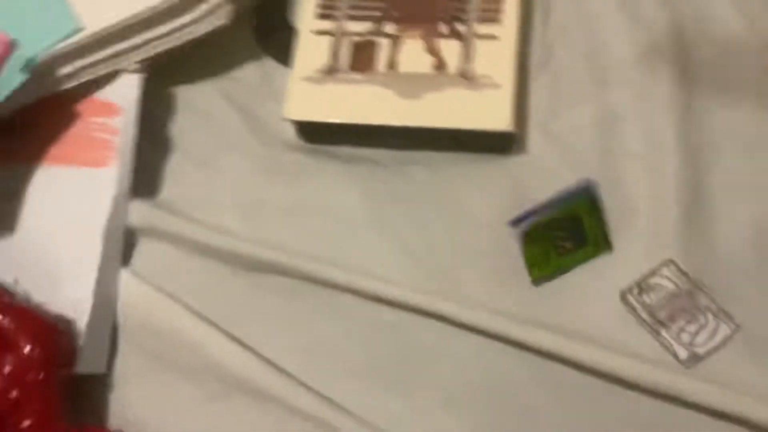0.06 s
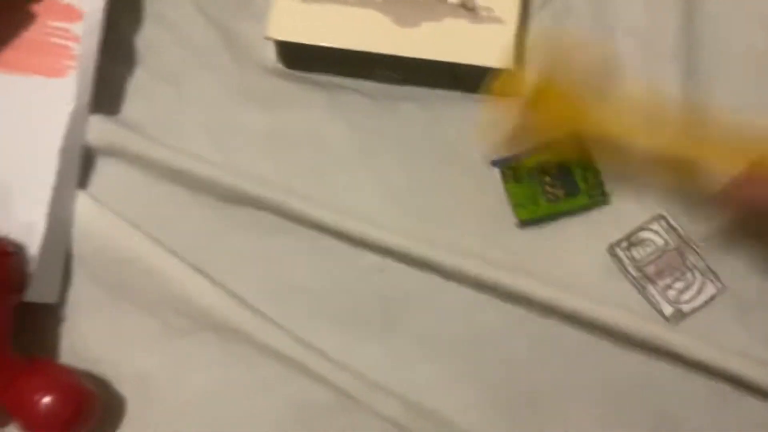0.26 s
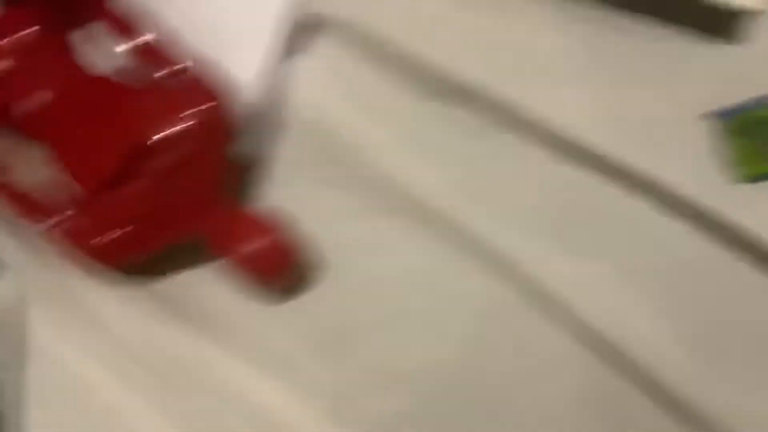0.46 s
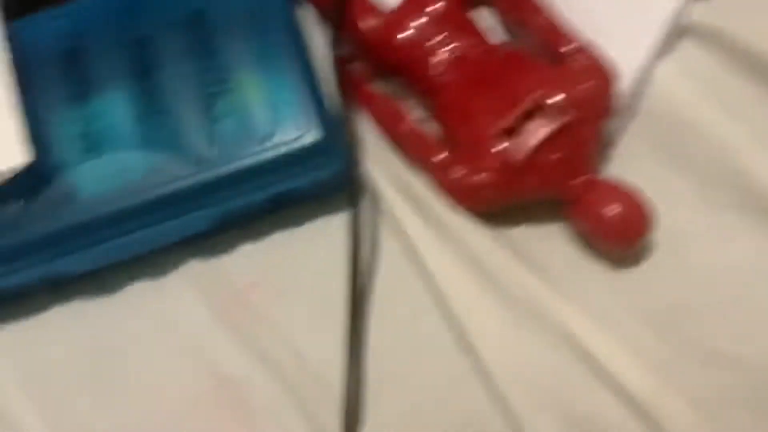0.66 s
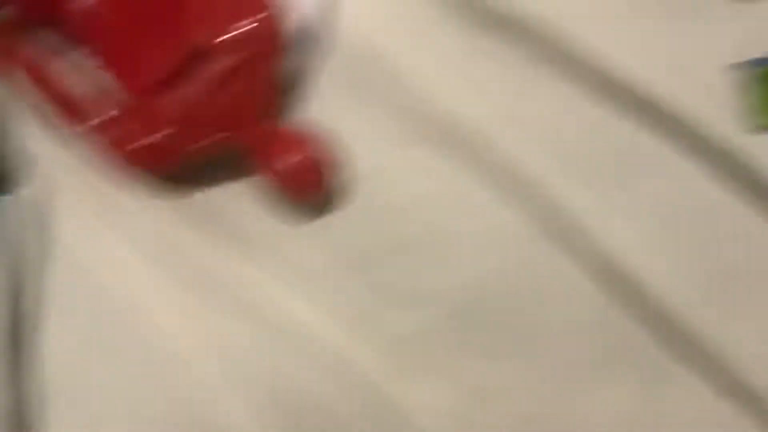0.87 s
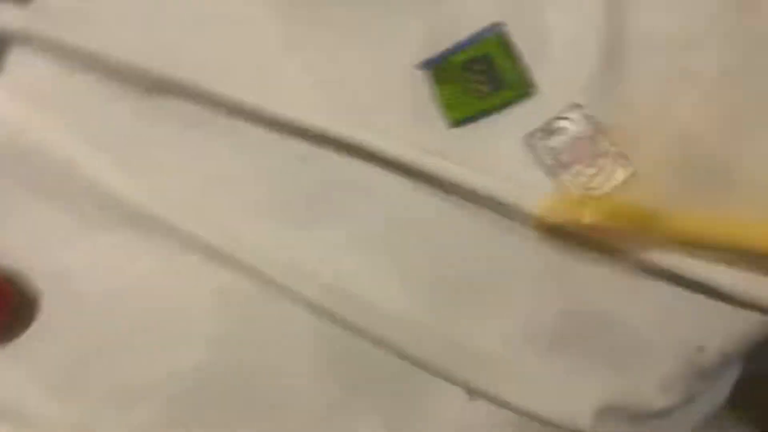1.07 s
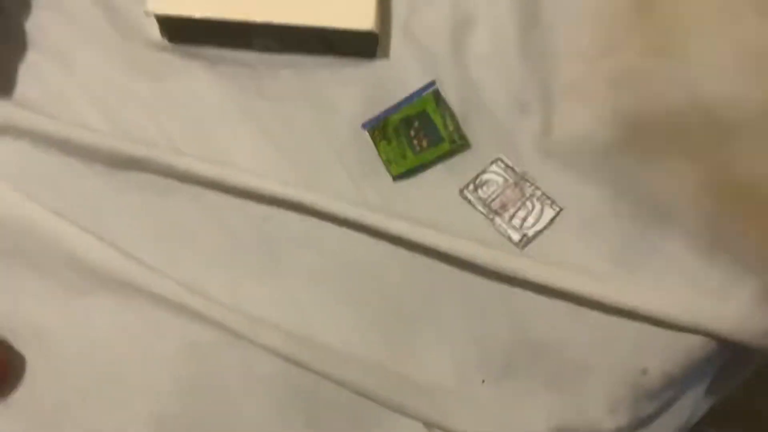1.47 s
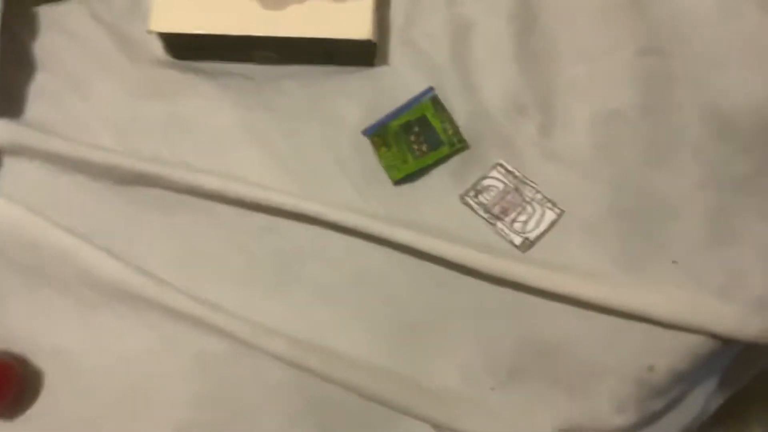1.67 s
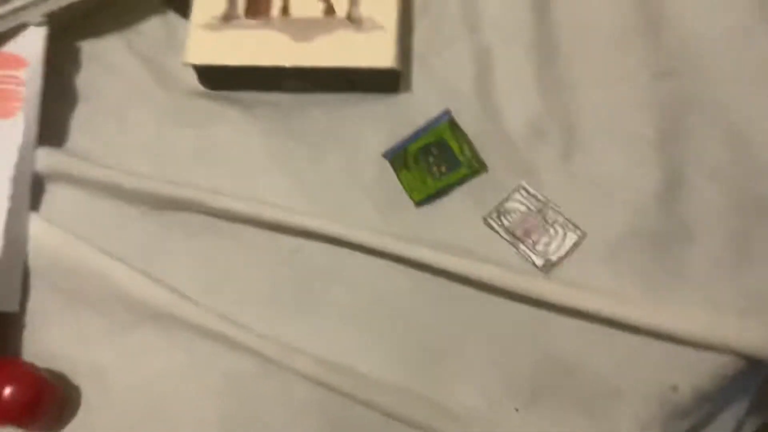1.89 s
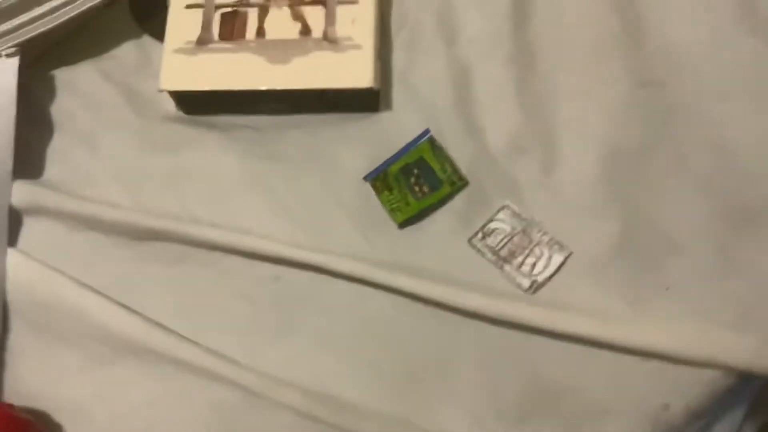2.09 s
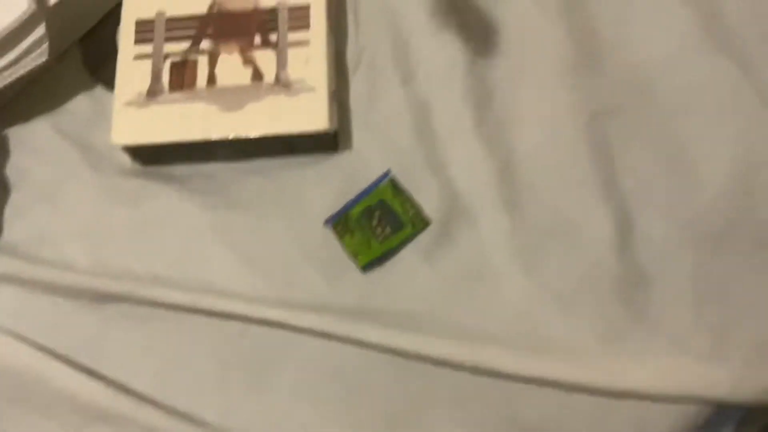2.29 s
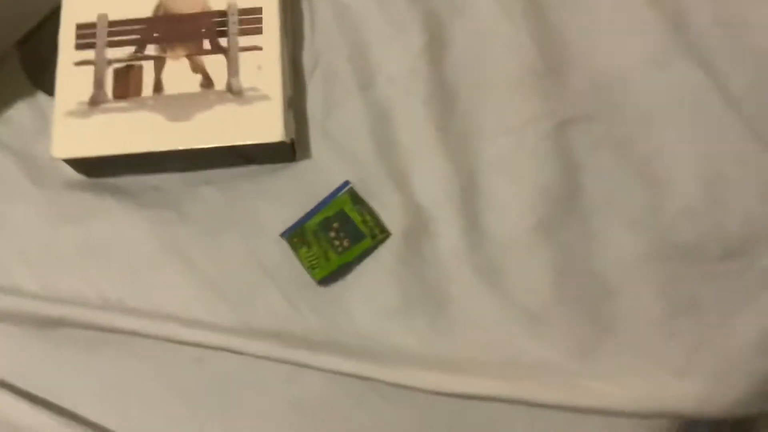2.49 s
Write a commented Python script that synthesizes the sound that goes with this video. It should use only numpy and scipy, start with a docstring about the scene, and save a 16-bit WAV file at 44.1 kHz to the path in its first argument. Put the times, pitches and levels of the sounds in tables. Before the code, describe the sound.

A plastic toy hammer knocks small pieces on bedding, each hit a crack and thump.

```python
"""Sharp, thumpy knocks: a plastic toy hammer hits small flat plastic pieces on a sheet-covered bed.
Each blow is a 2 ms crack of plastic, then a thump that falls in pitch as the springy bedding
carries highs faster than lows. Now and then a piece rattles against the hammer.
The quiet room answers briefly; between blows the cloth rustles faintly over a low rumble."""
import sys
import numpy as np
from scipy import signal
from scipy.fft import rfft, irfft, next_fast_len
from scipy.io import wavfile

SR = 44100
rng = np.random.default_rng(int(sys.argv[2]) if len(sys.argv) > 2 else 0)


def to_wav(sig):
    """Store sig (one row per channel, or 1-D mono) as 16-bit WAV at the path in sys.argv[1].

    Samples outside -1..1 are clipped; the rate is SR.
    """
    pcm = np.clip(np.atleast_2d(sig), -1, 1) * 32767
    pcm = np.round(pcm).astype(np.int16)
    wavfile.write(sys.argv[1], SR, pcm.T)  # frames by channels


N = 116865
LEAD = SR // 10  # samples of pre-roll before time zero
TIME = np.arange(N) / SR
BLOW_TIME = TIME[:SR // 8]


def from_db(db):
    """Decibels to gain."""
    return 10 ** (np.asarray(db) / 20)


def rms_one(x):
    """Scale to rms 1."""
    return x / np.sqrt(np.mean(x ** 2) + 1e-20)


def at_hz(points, hz):
    """Read a curve on a log-frequency axis."""
    freqs, values = np.transpose(points)
    return np.interp(np.log(np.maximum(hz, 1)), np.log(freqs), values)


def equalise(x, curve):
    """Minimum-phase EQ: nothing rings ahead of an attack."""
    size = 2 * next_fast_len(x.shape[-1])
    gain = from_db(at_hz(curve, np.fft.rfftfreq(size, 1 / SR)))
    cepstrum = irfft(np.log(gain))
    cepstrum[1:size // 2] *= 2
    cepstrum[size // 2 + 1:] = 0
    return irfft(rfft(x, size) * np.exp(rfft(cepstrum)))[..., :x.shape[-1]]


def stereo_noise(correlation, size):
    """White noise whose stereo width depends on frequency."""
    mid, side = rfft(rng.standard_normal((2, size)))
    shared = at_hz(correlation, np.fft.rfftfreq(size, 1 / SR))
    return irfft(np.sqrt(1 + shared) * mid + np.sqrt(1 - shared) * side * [[1], [-1]], size)


def pan(x, balance, phase=None):
    """Set the level and phase difference between left and right at each frequency."""
    size = next_fast_len(x.shape[-1] + LEAD)
    hz = np.fft.rfftfreq(size, 1 / SR)
    left_lead = at_hz(phase, hz) if phase else 0
    left = from_db(at_hz(balance, hz) / 2) * np.exp(.5j * left_lead)
    return irfft(rfft(x, size) * np.array([left, 1 / left]), size)[:, :x.shape[-1]]


def add(track, start_s, sound):
    """Mix a sound into a track that has pre-roll."""
    start = max(LEAD + int(start_s * SR), 0)
    part = sound[:len(track) - start]
    track[start:start + len(part)] += part


# Room tone, heavy in the bass: freq_hz, gain_db
RUMBLE_EQ = [(25, -20.5), (50, -7.5), (75, 1), (105, 4.5), (150, -11), (220, -15), (350, -22.5), (600, -32),
             (1600, -41.5), (2800, -46), (6000, -53.5), (16000, -51)]
# Stereo width as heard, centred lows and top, wide mids: freq_hz, correlation
RUMBLE_CORRELATION = [(120, .96), (250, .85), (550, .3), (2000, .2), (6000, .4), (10000, .9)]
def rumble(level_db=-46.5):
    """The room's steady low rumble with a trace of hiss."""
    noise = stereo_noise(RUMBLE_CORRELATION, LEAD + N)
    return from_db(level_db) * rms_one(equalise(noise, RUMBLE_EQ)[:, LEAD:])


# Tone of the sheet's rustle: freq_hz, gain_db
CLOTH_EQ = [(300, 2), (800, 2), (1600, 2), (2400, -5.5), (4000, -0.5), (7000, -5.5), (11000, -8),
            (16000, 0)]
# Stereo width as heard: freq_hz, correlation
CLOTH_CORRELATION = [(1000, 0.13), (8000, 0.53)]
# Light brushes of the sheet: peak_s, half_width_s, level_db
CLOTH_BRUSHES = [(0.538, .015, -71), (.6, 0.009, -83), (.745, 0.03, -57), (0.872, 0.021, -63),
                 (0.969, 0.024, -55.5), (1.06, 0.045, -53), (2.634, 0.013, -66)]
def cloth():
    """Fibres rub in soft, grainy swells."""
    swells = sum(from_db(level_db) * np.exp(-((TIME - peak_s) / half_width_s) ** 2)
                 for peak_s, half_width_s, level_db in CLOTH_BRUSHES)
    noise = stereo_noise(CLOTH_CORRELATION, N)
    grain = from_db(3 * rng.standard_normal(N // 64 + 1)).repeat(64)[:N]
    return swells * rms_one(equalise(noise * grain, CLOTH_EQ))


# Tone of the reverb: freq_hz, gain_db
REVERB_EQ = [(50, -22.5), (120, -10.5), (200, -17), (320, -11), (420, -12.5), (600, -13.5), (780, -4.5),
             (1000, -8), (1250, -10.5), (1460, -6.5), (1750, -9), (3000, -11), (6000, -11.5),
             (10000, -11.5), (16000, -4)]
# Time it takes to fall 60 dB: freq_hz, decay_s
REVERB_DECAY = [(100, 0.23), (400, 0.34), (1500, 0.44), (6000, 0.47), (10000, .38), (15000, 0.15)]
# Stereo width of the tail as heard: centred bass, wide mids, nearly mono at the very top:
# freq_hz, correlation
TAIL_CORRELATION = [(250, .9), (550, .15), (2000, 0), (4500, .35), (8000, .5), (13000, .9)]
def room(send, predelay_s=.0013, build_s=.0013):
    """A small room's diffuse tail; each octave fades at its own rate."""
    size = SR * 3 // 4
    t = np.maximum(TIME[:size] - predelay_s, 0)
    hz = np.fft.rfftfreq(size, 1 / SR)
    noise = rfft(stereo_noise(TAIL_CORRELATION, size))
    octaves_hz = np.geomspace(62.5, 16000, 9)
    tail = 0
    for centre_hz, weights in zip(octaves_hz, np.eye(len(octaves_hz))):
        band = irfft(noise * at_hz(list(zip(octaves_hz, weights)), hz), size)
        tail += band * np.exp(-np.log(1000) * t / at_hz(REVERB_DECAY, centre_hz))
    tail = rms_one(tail * (1 - np.exp(-t / build_s))) / np.sqrt(size)
    return signal.fftconvolve(send[None], equalise(tail, REVERB_EQ), axes=1)[:, :len(send)]


def thump(rise_s, decay_s, start_hz=5600, sweep_cycles=1.6, spread_s=.008, low_cut_hz=30):
    """A wave spreads through the bedding, highs first: the pitch dives as it thins out."""
    t = BLOW_TIME
    cycles = sweep_cycles * np.log(1 + t * start_hz / sweep_cycles)
    attack = 1 - np.exp(-(t / rise_s) ** 2)
    envelope = attack * np.exp(-t / decay_s) / (1 + (t / spread_s) ** 2)
    low_cut = signal.butter(1, low_cut_hz, "high", fs=SR, output="sos")
    return signal.sosfilt(low_cut, np.sin(2 * np.pi * cycles) * envelope)


def chatter(length_s, rise_s=.00087):
    """Hard surfaces meet in a brief flurry of tiny contacts."""
    envelope = (1 - np.exp(-BLOW_TIME / rise_s)) * np.exp(-(BLOW_TIME / length_s) ** 2)
    return envelope * rng.choice([-1, 1], len(BLOW_TIME))


def crack(force, tone, level_db):
    """A contact force sounds the plastic, with the energy of 2 ms at the given level."""
    burst = equalise(force, tone)
    return from_db(level_db) * burst / np.sqrt(np.sum(burst ** 2) / (.002 * SR))


# The bright snap of the plastic itself: freq_hz, gain_db
PLASTIC_EQ = [(300, -19.5), (600, -10), (1000, 2), (2000, -0.5), (2800, -3.5), (3900, -1.5), (5500, 3.5),
              (7300, -3), (10000, 1), (12000, -5.5), (14000, -2.5), (16000, -5.5)]
def plastic_tone(tilt_db_per_octave, clack_hz, clack_db, piece_hz, piece_db):
    """EQ of one crack: the plastic, the hammer's broad hollow clack, the piece's narrow resonance."""
    hz = np.geomspace(200, 18000, 160)
    tilt = tilt_db_per_octave * np.log2(hz / hz[0])
    clack = clack_db * np.exp(-np.log2(hz / clack_hz) ** 2)
    resonance = piece_db * np.exp(-(np.log2(hz / piece_hz) / .16) ** 2)
    return np.transpose([hz, at_hz(PLASTIC_EQ, hz) + tilt + clack + resonance])


# A piece rattles or ticks against the hammer: start_s, level_db
PIECE_RATTLES = [(0.158, -50), (1.2841, -31.5), (1.479, -30.5), (1.9188, -29.5), (2.382, -36), (2.46, -46)]
# The knocks: start_s, thump_db, rise_s, decay_s, crack_db, tilt_db_per_octave,
# clack_hz, clack_db, piece_hz, piece_db, thump_send_db, crack_send_db
HAMMER_BLOWS = [(-0.03, 4.5, 0.0044, .02, -10.5, 1, 1500, 1, 4730, 4.5, -0.5, 0),
                (0.2015, 5, 0.0058, 0.033, -9, -2, 1940, -5.5, 5700, 0.5, 1.5, -2.5),
                (1.0603, 4, 0.0065, 0.0044, -24, -9.5, 1220, -1, 3400, 12, -0.5, -1.5),
                (1.2748, -3.5, 0.0026, 0.049, -10, -1, 800, -6.5, 6320, 11, -1.5, -2.5),
                (1.4706, 4.5, 0.0031, 0.009, -11, -2.16, 1070, -2, 6090, 9, -2.5, -2),
                (1.6864, 3.5, 0.0029, 0.014, -12, 2, 1135, 12, 9000, 5.5, 1.5, -1),
                (1.9084, -0.5, 0.0029, 0.027, -11, 0.83, 1120, 8, 7100, 6.5, 0.5, 1),
                (2.1306, 2.5, 0.0029, 0.011, -11.5, 0.5, 1070, 13.5, 9200, 9.5, 0.5, -1.5),
                (2.3658, 6, 0.0049, 0.021, -9, -4.5, 1244, 6, 2170, 4.5, 1, -4.5)]
def hammer():
    """Plastic cracks and bedding thumps: the direct sound and two reverb sends."""
    direct, thump_send, crack_send = np.zeros((3, LEAD + N))
    click = signal.unit_impulse(len(BLOW_TIME))  # in the room each flurry blurs into one click
    for start_s, thump_db, rise_s, decay_s, crack_db, *eq, thump_send_db, crack_send_db in HAMMER_BLOWS:
        body = from_db(thump_db) * thump(rise_s, decay_s)
        tone = plastic_tone(*eq)
        add(direct, start_s, body + crack(chatter(length_s=.0018), tone, crack_db))
        add(thump_send, start_s, from_db(thump_send_db) * body)
        add(crack_send, start_s, from_db(crack_send_db) * crack(click, tone, crack_db))
    for start_s, level_db in PIECE_RATTLES:
        add(direct, start_s, crack(chatter(length_s=.0025), PLASTIC_EQ, level_db))
        add(crack_send, start_s, crack(click, PLASTIC_EQ, level_db))
    return direct, thump_send, crack_send


# Where the reverb sits: freq_hz, left_minus_right_db
REVERB_PAN = [(100, 2), (300, -4), (550, -3.5), (850, 3.5), (1400, -0.5), (4200, -0.5), (6000, -8.5),
              (9000, 0.5), (13000, 2)]
# The knocks sit to the right: freq_hz, left_minus_right_db
HAMMER_PAN = [(100, -1.5), (300, -4.5), (800, -9.5), (1400, -7), (3000, -0.5), (4200, -1.5), (6000, -9),
              (9000, 0), (13000, -1.5)]
# Their phase between the sides: freq_hz, left_lead_rad
HAMMER_PHASE = [(100, -.1), (500, -.2), (900, .6), (1500, .6), (2000, -1.7), (2500, -1.5), (3000, 1.1),
                (4200, -.3), (13000, -.6)]
def scene():
    """Knocks over cloth and rumble; bedding and plastic each excite the room in their own way."""
    direct, thump_send, crack_send = hammer()
    reverb = room(thump_send) + room(crack_send)
    knocks = pan(direct, HAMMER_PAN, HAMMER_PHASE) + pan(reverb, REVERB_PAN)
    return knocks[:, LEAD:] + cloth() + rumble()


def record(dry):
    """Soft-clip the loudest peaks and cut the very top."""
    ceiling, stopband_hz = .9, 16900
    rounded = dry / (1 + (dry / ceiling) ** 4) ** .25
    return signal.sosfilt(signal.cheby2(12, 60, stopband_hz, fs=SR, output="sos"), rounded)


dry = scene()
out = record(dry)
to_wav(out)
```